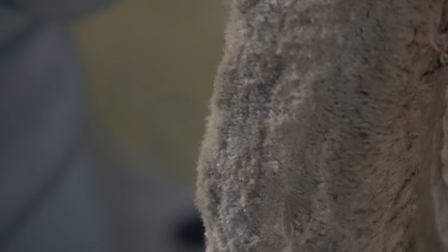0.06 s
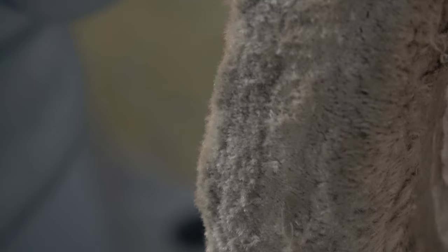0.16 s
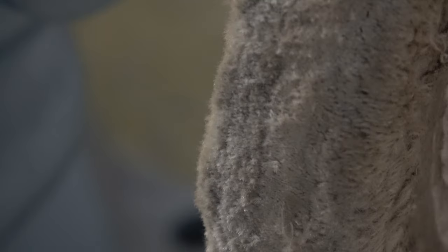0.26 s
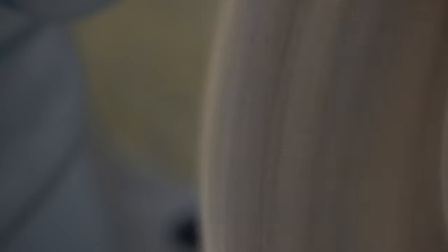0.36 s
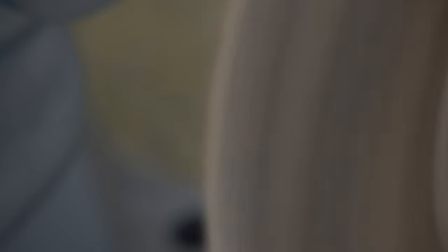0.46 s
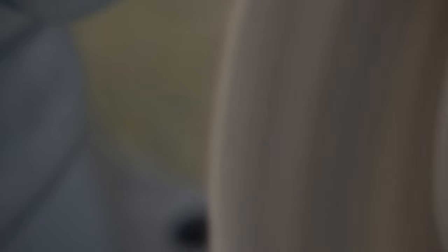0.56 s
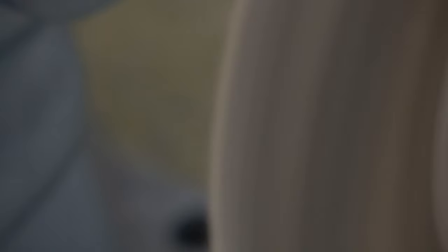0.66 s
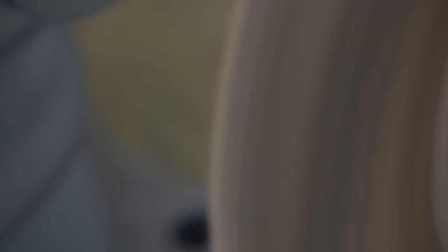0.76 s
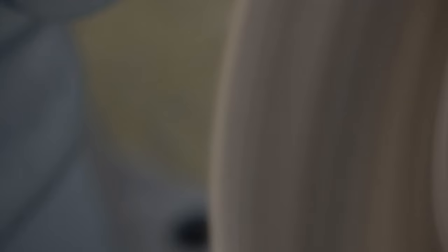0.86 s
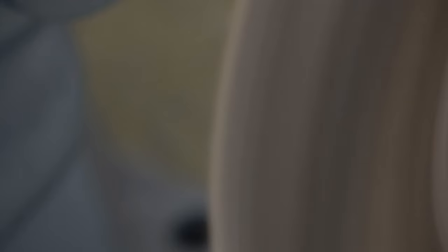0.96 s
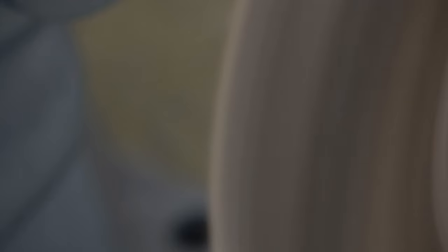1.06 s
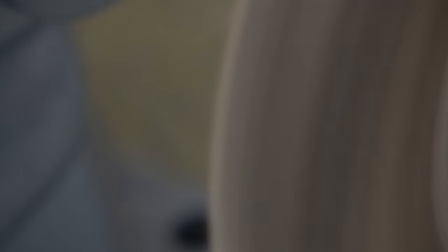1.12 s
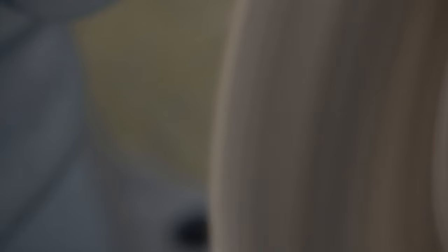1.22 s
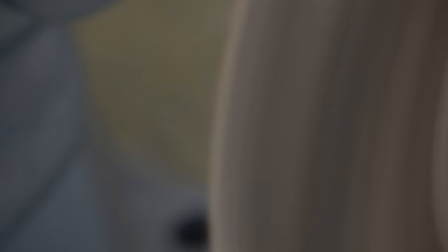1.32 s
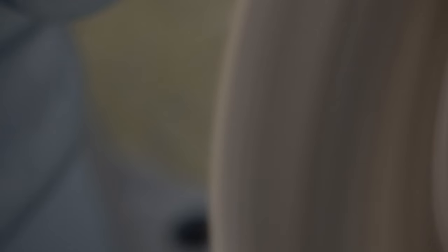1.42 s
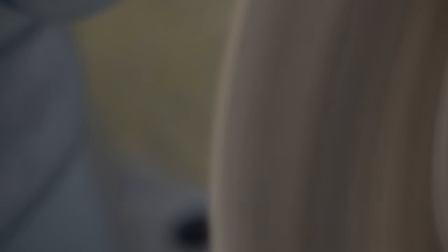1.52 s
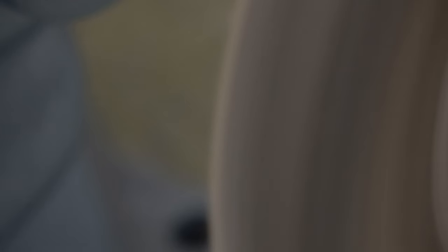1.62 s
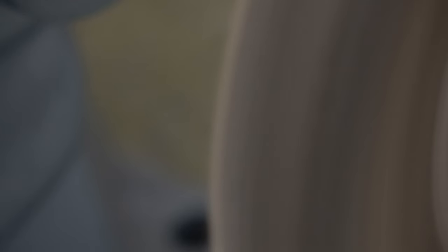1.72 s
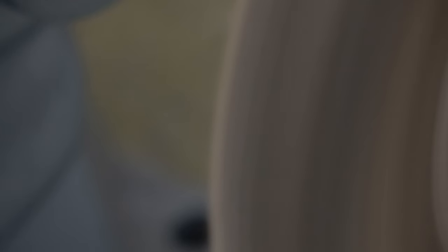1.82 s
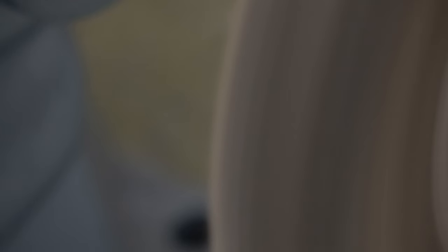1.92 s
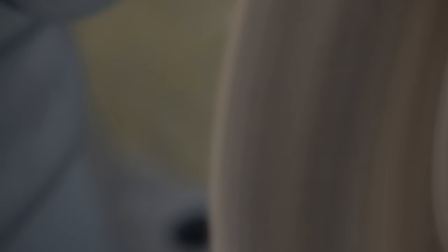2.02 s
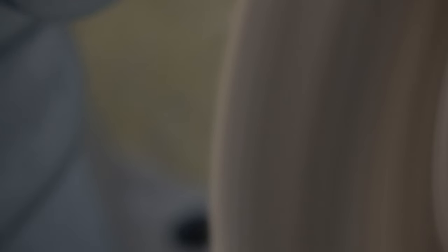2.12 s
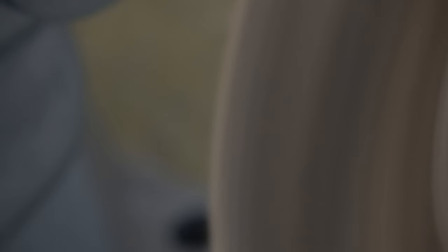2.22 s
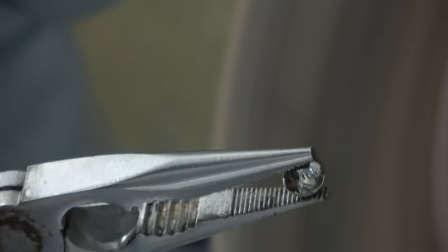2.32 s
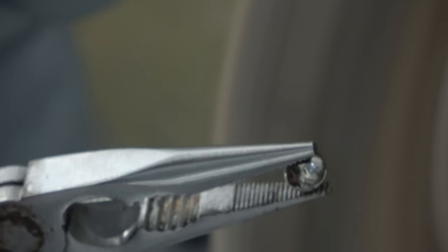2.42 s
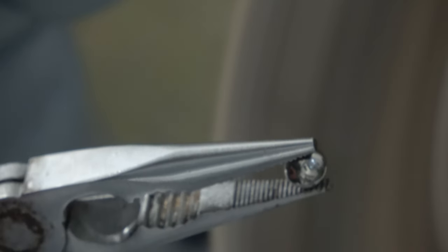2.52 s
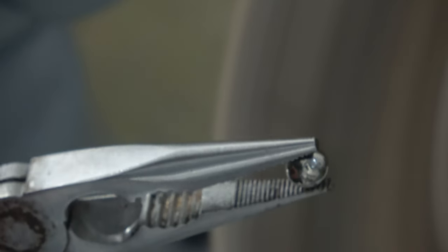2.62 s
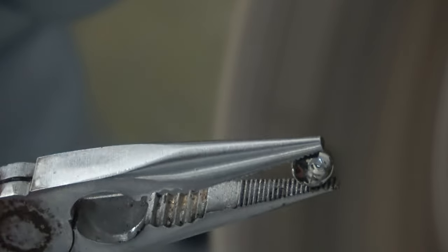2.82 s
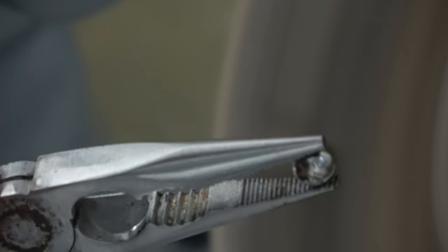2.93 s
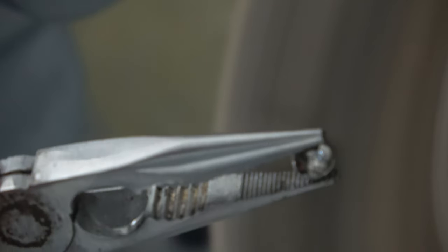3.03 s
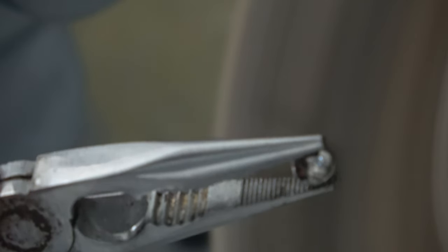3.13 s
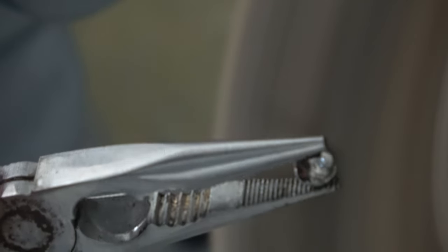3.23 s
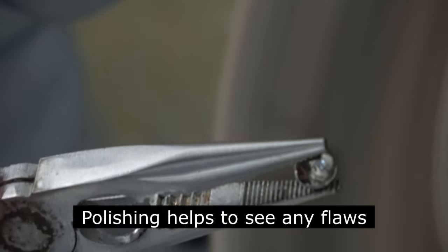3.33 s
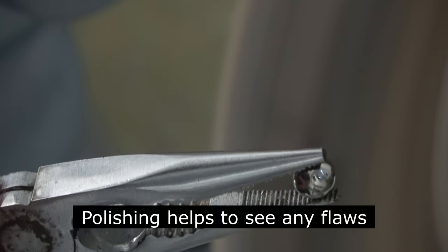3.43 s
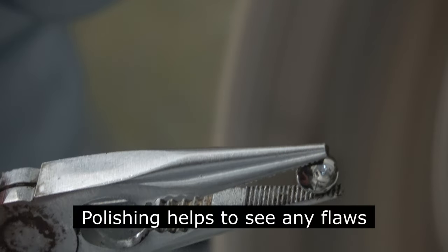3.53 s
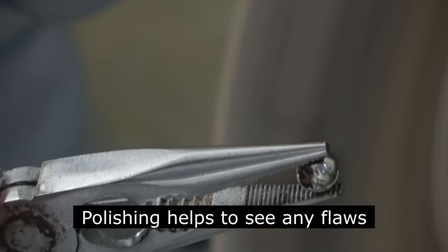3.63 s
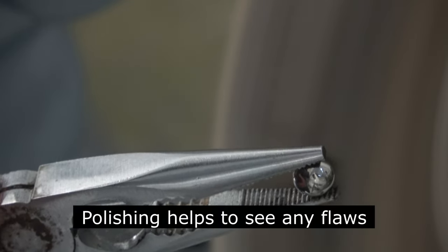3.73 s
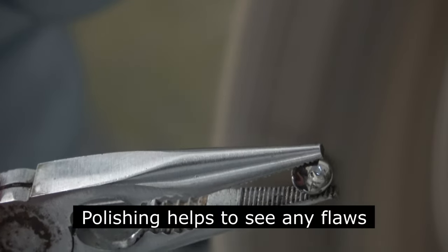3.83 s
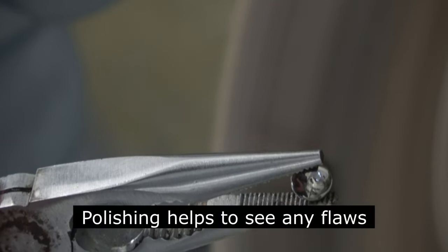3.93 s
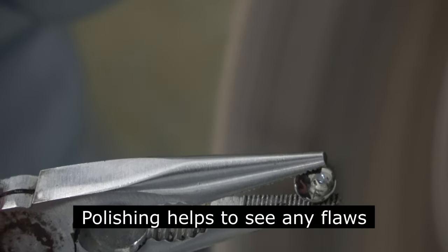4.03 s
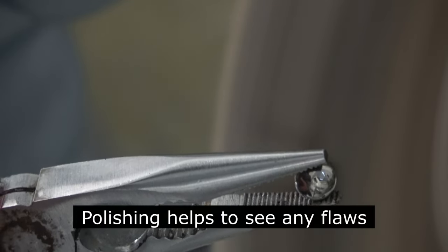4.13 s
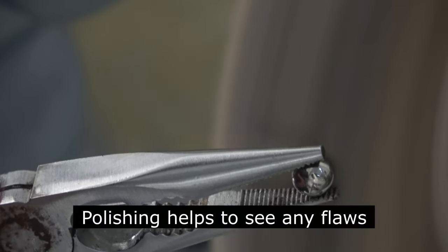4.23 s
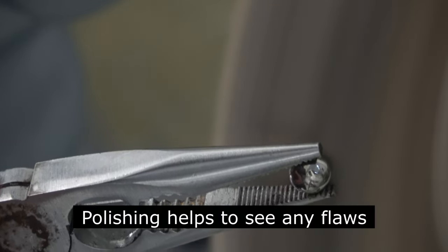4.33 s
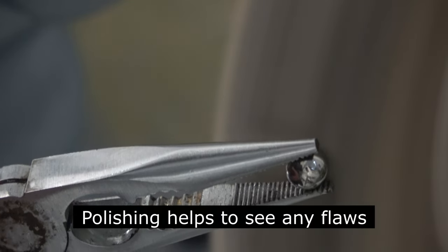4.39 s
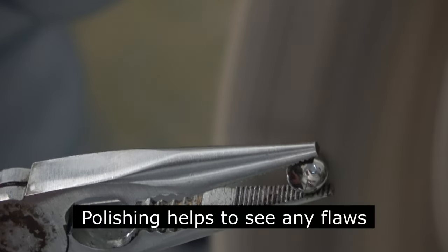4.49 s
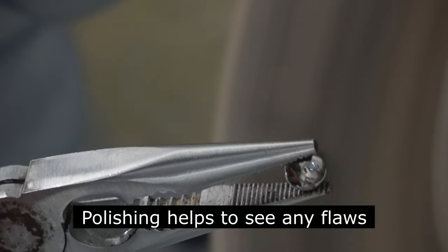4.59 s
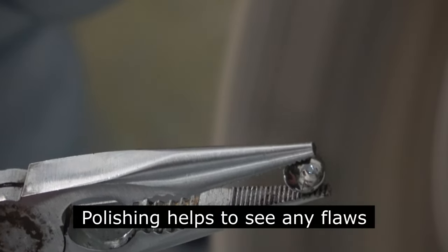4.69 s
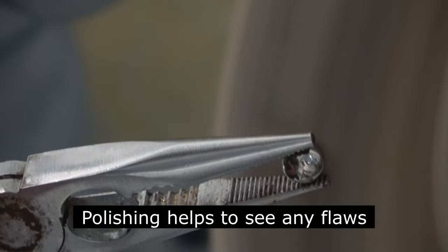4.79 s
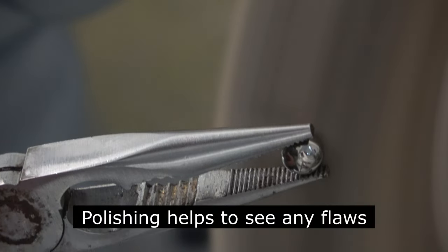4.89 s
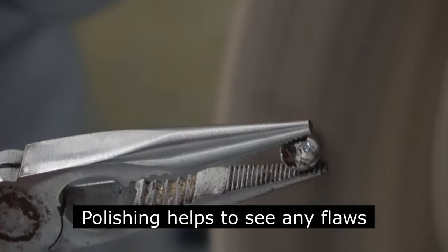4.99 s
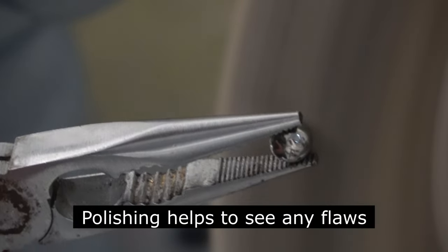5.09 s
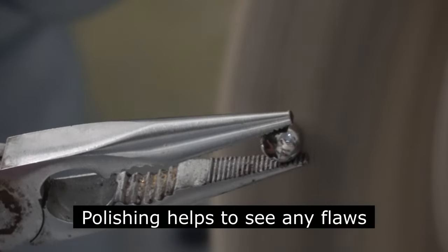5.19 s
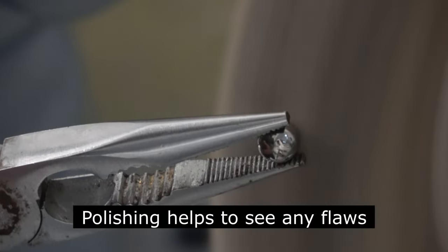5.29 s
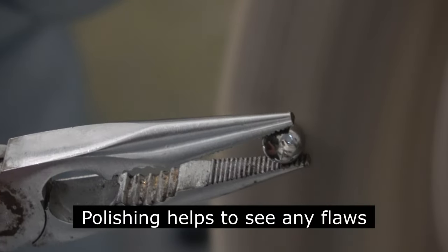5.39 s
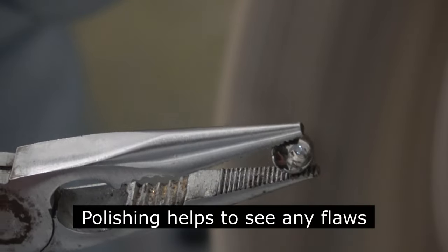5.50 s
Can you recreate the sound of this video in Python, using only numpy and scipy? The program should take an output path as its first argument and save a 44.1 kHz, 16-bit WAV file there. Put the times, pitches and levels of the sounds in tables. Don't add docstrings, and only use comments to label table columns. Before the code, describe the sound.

Near-silence with a faint dying clatter comes first, then a jolting motor start shakes its housing. The growl gives way to a stable deep thrum, thin whine and broad airy hiss. Midway the hum changes slightly; light fluttering cloth-on-steel rubs swell and fade over it until the end. Close stereo pickup, small indoor shop, little echo.

```python
import sys
import numpy as np
from scipy import signal
from scipy.fft import rfft, irfft, next_fast_len
from scipy.io import wavfile
from scipy.ndimage import uniform_filter1d, map_coordinates

SR = 44100
rng = np.random.default_rng(int(sys.argv[2]) if len(sys.argv) > 2 else 0)


def gain_from_db(level_db):
    decades = np.asarray(level_db, float) / 20
    return 10 ** decades


def digitize_waveform(pressure):
    field = np.atleast_2d(pressure).T
    bounded = np.clip(field, -1, 1)
    quanta = np.round(bounded * 32767).astype(np.int16)
    wavfile.write(sys.argv[1], SR, quanta)


N = 244755
TIME_S = np.arange(N) / SR
CHANGE_S, CHANGE_FADE_S, CHANGE_TURNS = 2.33, .02, -.118
SLOTS = 26

# time_s, speed_turns_per_s
SHAFT_RUN_UP = [(.375, 1), (.44, 9), (.5, 17), (.54, 26.5), (.58, 35.5), (.612, 43.5), (.655, 47.5),
                (.69, 49.3), (.76, 49.45)]
# time_s, speed_turns_per_s
SHAFT_RUNNING = [(.9, 49.5), (2.32, 49.49), (2.34, 49.55), (5.55, 49.555)]
# multiple_of_shaft_speed, level_db
SHAFT_ORDERS = [(1, -7), (2, -14), (3, 0), (4, -15.5), (5, -11.5), (6, -20), (7, -19.5), (8, -22.5),
                (9, -14.5)]
# multiple_of_shaft_speed, level_db
LATER_SHAFT_ORDERS = [(1, -4), (2, -13), (3, 0), (4, -15.5), (5, -18), (6, -23.5), (7, -18), (8, -28),
                      (9, -21)]
# multiple_of_shaft_speed, level_db
SIDE_WHINES = [(23, -58.5), (28, -57.5), (25, -65)]
# crest_s, depth_0_to_1
WHINE_BEATS = [(1.62, 0.31), (4.2, 0.19)]
# time_s, level_db
STARTING_STRAIN = [(.36, -49), (.374, -37), (.436, -27), (.447, -11.5), (.53, -13.5), (.578, -25.5),
                   (.592, -17), (.69, -43), (.75, -41)]
# time_s, peak_db
ROTOR_JOLTS = [(0.379, -18), (0.449, -5), (0.464, -6), (0.506, -12), (0.532, -4), (0.554, -7), (0.589, -19),
               (0.653, -18)]
# time_s, peak_db, pitch_hz
MOUNT_TICKS = [(0.39, -46, 950), (.3735, -47, 7700), (.4357, -42, 1700), (.462, -19.5, 2050),
               (.4605, -34, 3300), (.46, -30.5, 3900), (.459, -46, 9500)]
# start_s, end_s
UNBALANCE_BUILD_UP = (.62, 0.9)
THRUM_BUILD_UP = (0.656, 0.79)
WIND_BUILD_UP = (.6, 0.97)
# pitch_hz, width_hz, level_db
HOUSING_MODES = [(228.5, 27, -1), (413.5, 47, -0.5), (448, 25.3, 5.5), (494.5, 42.5, -3.5), (620, 125, -14),
                 (860, 103, -15), (1113, 135, -15), (1360, 59, -30)]
# pitch_hz, width_hz, level_db
BENCH_MODES = [(85.4, 5.1, -52), (169, 7.7, -51), (774, 41, -54)]
# frequency_hz, density_db_per_hz
BODY_SPECTRUM = [(35, -37), (60, -9), (96, -16.5), (150, -6), (201, -16.5), (435, -0.5), (574, -12),
                 (1260, -14.5), (1580, -21.5), (3000, -50), (3900, -63), (6600, -120)]
# frequency_hz, density_db_per_hz
WIND_SPECTRUM = [(880, -12), (1500, -7.5), (2070, -6), (3210, -6.5), (3870, -7), (4800, -4.5), (7900, -1),
                 (13100, -5.5), (14500, -9), (15500, -11.5)]
# frequency_hz, density_db_per_hz
RUB_SPECTRUM = [(900, -5), (1500, -6), (1900, 1), (2400, -0.5), (2800, -1.5), (3200, -2.5), (4000, 1),
                (5000, -4), (7000, -1.5), (9000, -7), (11000, -11), (15000, -23)]
# time_s, level_db, spread_s, extra_brightness_db, jaw_song_db
BALL_PUSHES = [(2.98, -41, 0.069, 2, -46.5), (3.23, -44.5, 0.061, 4, -47), (3.86, -33, 0.082, 2, -49),
               (4.32, -39.5, 0.077, 4.5, -49), (4.49, -35, 0.053, 5, -49), (4.95, -45, 0.075, 7.5, -52),
               (5.075, -32.5, 0.057, 3, -53), (5.37, -39.5, 0.091, 6.5, -64)]
# frequency_hz, density_db_per_hz
ROOM_SPECTRUM = [(18, -25), (30, 5.5), (152, -9), (535, -26), (793, -22.5), (880, -28), (1210, -26),
                 (1530, -31), (2140, -30), (2510, -35), (4470, -29.5), (5510, -30.5), (10100, -28.5),
                 (13100, -21), (15700, -22)]
# frequency_hz, excess_db
LEFT_EXCESS = [(60, 3.5), (92, 6.5), (140, 8.5), (210, 1.5), (330, -5.5), (500, -6.0), (770, -0.5),
               (1170, -2), (1790, -1), (2740, 1), (4190, 3.5), (6410, 2.5), (9810, 2.0), (15000, 3)]
# frequency_hz, level_under_mid_db
LOOSE_SIDE = [(50, -24), (300, -25), (1000, -15), (1700, -34), (3000, -19.5), (4800, -33), (5800, -12.5),
              (8000, -13.5), (13500, -9), (15200, -24)]


def noise():
    return rng.standard_normal(N)


def rms_one(x):
    return x / np.sqrt(np.mean(x ** 2) + 1e-20)


def in_time(rows):
    s, *columns = np.transpose(rows)
    return [np.interp(TIME_S, s, column) for column in columns]


def at_hz(points, hz):
    point_hz, db = np.array(points).T
    return np.interp(np.log(hz + 1), np.log(point_hz), db)


def shaped(x, gain_at):
    size = next_fast_len(N)
    hz = np.arange(size // 2 + 1) * SR / size
    return irfft(rfft(x, size) * gain_at(hz), size)[..., :N]


def coloured(x, spectrum):
    return rms_one(shaped(x, lambda hz: gain_from_db(at_hz(spectrum, hz))))


def drift(rate_hz):
    r = np.exp(-80 * np.pi * rate_hz / SR)
    slow = signal.lfilter([1], [1, -2 * r, r * r], rng.standard_normal(N // 40 + 2002))[2000:]
    return np.interp(np.arange(N) / 40, np.arange(len(slow)), rms_one(slow))


def resonance(x, hz, width_hz):
    r = np.exp(-np.pi * width_hz / SR)
    poles = [1, -2 * r * np.cos(2 * np.pi * hz / SR), r * r]
    return signal.lfilter([(1 - r * r) / 2, 0, (r * r - 1) / 2], poles, x + 1e-18)


def two_resonances(x, hz, width_hz, second_hz, second_width_hz):
    return resonance(resonance(x, hz, width_hz), second_hz, second_width_hz)


def housing(x):
    ringing = np.zeros(N)
    for k, (hz, width_hz, db) in enumerate(HOUSING_MODES):
        ringing += (-1) ** k * gain_from_db(db) * resonance(x, hz, width_hz)
    return ringing


def after(s, fade_s):
    return np.clip((TIME_S - s) / fade_s + .5, 0, 1)


def after_change():
    return after(CHANGE_S, CHANGE_FADE_S)


def bell(s, spread_s):
    return np.exp(-.5 * ((TIME_S - s) / spread_s) ** 2)


def settling(start_s, end_s):
    return (1 - after((start_s + end_s) / 2, end_s - start_s)) ** 2


def order(turns, multiple):
    later, start = after_change(), rng.random()
    if multiple < 10:
        start = multiple ** 2 / 4
    early_wave, late_wave = [np.sqrt(2) * np.sin(2 * np.pi * (multiple * (turns + jump) + start))
                             for jump in (0, CHANGE_TURNS)]
    return (1 - later) * early_wave + later * late_wave


def quiet_room():
    return gain_from_db(-51.5) * coloured(noise(), ROOM_SPECTRUM)


def distant_clatter():
    clatter = rms_one(resonance(noise(), 2120, 150) + .6 * resonance(noise(), 3300, 400))
    hold_s, fall_db_per_s = 0.091, 89
    return gain_from_db(-66 - fall_db_per_s * np.maximum(TIME_S - hold_s, 0)) * clatter


def pushes():
    rest = gain_from_db(-48.5) * (0.41 + 0.78 * after(2.9, 0.42))
    push, sheen, song = rest, rest * gain_from_db(-9), gain_from_db(-65)
    for s, db, spread_s, bright_db, song_db in BALL_PUSHES:
        push = push + gain_from_db(db) * bell(s, spread_s)
        sheen = sheen + gain_from_db(db + bright_db) * bell(s, spread_s)
        song_swell = bell(s, 1.7 * spread_s)
        song = song + gain_from_db(song_db) * np.minimum(1, 1.5 * song_swell ** 2) ** 2
    return push, sheen / push, song


def ball_on_cloth(turns):
    push, bright, jaws = pushes()
    face = rng.standard_normal((24, 900)) * gain_from_db(3.5 * rng.standard_normal(900))
    across = TIME_S * 2.2
    track = map_coordinates(face, [across, turns % 1 * 900], order=1, mode="grid-wrap")
    rub = coloured(rms_one(track) + .5 * noise(), RUB_SPECTRUM)
    high_pass = signal.butter(2, 4800, "high", fs=SR, output="sos")
    sheen = signal.sosfiltfilt(high_pass, rub)
    rub = rub + (bright - 1) * sheen
    song = gain_from_db(-4) * jaws * (order(turns, 66) + order(turns, 67))
    return after_change() * push * rub, after_change() * song


def wheel_wind(turns, speed):
    sag_db_per_s, lag_db = 0.24, -2.5
    level_db = -31.5 - sag_db_per_s * np.abs(TIME_S - 1.3) + lag_db * settling(*WIND_BUILD_UP)
    white = coloured(rng.standard_normal((2, N)), WIND_SPECTRUM)
    throb = 1 + .035 * order(turns, 1) + .045 * order(turns, 2) + .025 * order(turns, 4)
    out, gust = 0, drift(3)
    edges_hz = 700 * 2 ** np.arange(0, 4.8, .5)
    for k, (low, high) in enumerate(zip(edges_hz, edges_hz[1:])):
        band_pass = signal.butter(2, [low, high], "band", fs=SR, output="sos")
        band = signal.sosfilt(band_pass, white[k % 2])
        waking = np.minimum(1.06 * speed, 1) ** (0.71 + (low / 4500) ** 1.8)
        out = out + band * waking * gain_from_db(0.12 * gust + .5 * drift(40))
    return gain_from_db(level_db) * throb * out


def housing_rumble(speed):
    wakes = after(2.55, 0.075)
    lull_db = -6 * bell(4.52, .1)
    rumble_db = -47 + 9.5 * wakes + drift(6.0) + lull_db + 1.5 * drift(19.0)
    rumble = gain_from_db(rumble_db) * rms_one(resonance(housing(noise()), 430, 150))
    body = gain_from_db(-38 + drift(12.5)) * coloured(noise(), BODY_SPECTRUM)
    for hz, width_hz, db in BENCH_MODES:
        body += gain_from_db(db) * rms_one(two_resonances(noise(), hz, width_hz, hz, 3 * width_hz))
    guard = rms_one(two_resonances(noise(), 508, 46, 508, 120))
    guard_db = -40.5 - 27 * np.maximum(TIME_S - .7, 0)
    body += after(.7, .04) * gain_from_db(guard_db) * guard
    return speed ** 3 * (rumble + body)


def strained_housing():
    growl_db, = in_time(STARTING_STRAIN)
    pulls = np.diff(np.floor(100 * np.arange(N + 1) / SR)) * 21 * gain_from_db(5.1 * drift(35))
    shake = rms_one(resonance(housing(0.39 * pulls + 1.1 * noise()), 450, 160))
    shake = shake / np.sqrt(uniform_filter1d(shake ** 2, size=300) + .03)

    rattle_db = -23 + 0.76 * growl_db - 22 * (1 - after(0.429, .02))
    touches = noise() * gain_from_db(2.2 * drift(70))
    low_rattle = resonance(two_resonances(touches, 920, 960, 1000, 1170), 1200, 1900)
    high_rattle = two_resonances(touches, 2000, 350, 3000, 600)
    rattle = rms_one(low_rattle + 0.066 * high_rattle)

    lurch_db = 6.5 * bell(0.443, .025)
    rock_db = -41 + lurch_db - 20 * settling(0.36, 0.403)
    rock = rms_one(two_resonances(noise(), 53, 60, 55, 70))
    return gain_from_db(growl_db) * shake + gain_from_db(rattle_db) * rattle + gain_from_db(rock_db) * rock


def rotor_jolts():
    jolts = np.zeros(N)
    for s, db in ROTOR_JOLTS:
        first = round(s * SR)
        jolts[first:first + 70] = gain_from_db(db + 3) * np.hanning(70)
    return jolts


def mount_ticks():
    ticks = np.zeros(N)
    for s, db, hz in MOUNT_TICKS:
        click = np.zeros(N)
        click[round(s * SR) + np.array([0, 60, 150])] = [.6, 1, -.5]
        ticks += gain_from_db(db + 30) * two_resonances(click, hz, 450, hz, 1600)
    return ticks


def rising_slot_whine(turns):
    level_db = -26.5 + 12 * bell(0.563, 0.037) + 3.0 * drift(40)
    mains = 2 * np.pi * 100 * TIME_S
    beat = .8 + 1.6 * np.cos(mains) + .9 * np.cos(2 * mains + 1)
    return (1 - after(.67, .06)) * gain_from_db(level_db) * beat * order(turns, SLOTS)


def start_up(turns):
    live = after(.374, 0.0052) * (1 - after(0.74, 0.099))
    struck = housing(live * rising_slot_whine(turns) + rotor_jolts())
    return live * strained_housing() + struck + mount_ticks()


def slot_whine(turns):
    later, beat_s = after_change(), 1.15
    early_beat, late_beat = [np.abs(1 + depth * np.exp(2j * np.pi * (TIME_S - s) / beat_s))
                             for s, depth in WHINE_BEATS]
    gain = (1 - later) * gain_from_db(-46.5) * early_beat + later * gain_from_db(-43.5) * late_beat
    arrival_db = 13.5 * bell(0.653, 0.01)
    return after(.645, .03) * gain * gain_from_db(0.5 * drift(3.8) + arrival_db) * order(turns, SLOTS)


def shaft_hum(turns, speed):
    later = after_change()
    unbalance_db = -35 - 8.75 * settling(*UNBALANCE_BUILD_UP) + 0.16 * drift(6.1)
    thrum_db = -28 - 4 * later - 25 * settling(*THRUM_BUILD_UP) + 0.064 * drift(7)
    out = gain_from_db(unbalance_db) * order(turns, 0.99) + gain_from_db(thrum_db) * order(turns, 3)
    for (multiple, db), (_, later_db) in zip(SHAFT_ORDERS, LATER_SHAFT_ORDERS):
        if multiple not in (1, 3):
            level_db = db + later * (later_db - db) - 31 + 1.1 * drift(1.8)
            out += gain_from_db(level_db) * order(turns, multiple)
    for multiple, db in SIDE_WHINES:
        out += gain_from_db(db + 2.6 * drift(2.2)) * order(turns, multiple)
    return speed ** 9 * out


def ports(mid):
    lean = shaped(mid, lambda hz: np.tanh(at_hz(LEFT_EXCESS, hz) * np.log(10) / 40))
    first_echo = np.concatenate([np.zeros(1100), mid])[:N]
    second_echo = np.concatenate([np.zeros(1730), mid])[:N]
    side = lean + shaped(first_echo - second_echo, lambda hz: gain_from_db(at_hz(LOOSE_SIDE, hz) - 3.0))
    return np.array([mid + side, mid - side])


def scene():
    turns_per_s, = in_time(SHAFT_RUN_UP + SHAFT_RUNNING)
    turns = np.cumsum(turns_per_s) / SR
    speed = np.clip(turns_per_s / 49.4, 0, 1)
    rub, song = ball_on_cloth(turns)
    mid = quiet_room() + distant_clatter() + rub + wheel_wind(turns, speed)
    mid = mid + housing_rumble(speed) + start_up(turns) + shaft_hum(turns, speed)
    whine_lean = -.7 + 0.21 * after_change()
    sides = np.array([[1], [-1]])
    return ports(mid) + slot_whine(turns) * (1 + whine_lean * sides) + song * (1 + 0.099 * sides)


def gain_control(x, above_db, share, release_db_s):
    level_db = 10 * np.log10(uniform_filter1d(np.mean(x ** 2, axis=0), size=300) + 1e-12)
    slope = release_db_s * TIME_S
    held_db = np.maximum.accumulate(level_db + slope) - slope
    cut_db = share * np.maximum(held_db - above_db, 0)
    return x * gain_from_db(-uniform_filter1d(cut_db, size=200))


def low_pass(x):
    return signal.sosfilt(signal.butter(12, 16120, fs=SR, output="sos"), x)


def record(dry):
    held = gain_control(dry, above_db=-23, share=.5, release_db_s=220)
    rounded = .5 * np.tanh(held / .5)
    high_pass = signal.butter(2, 28, "high", fs=SR, output="sos")
    without_lows = signal.sosfilt(high_pass, rounded)
    finished = shaped(without_lows, lambda hz: np.clip((15760 - hz) / 60, 0, 1))
    return low_pass(finished)


dry = scene()
out = record(dry)
digitize_waveform(out)
```